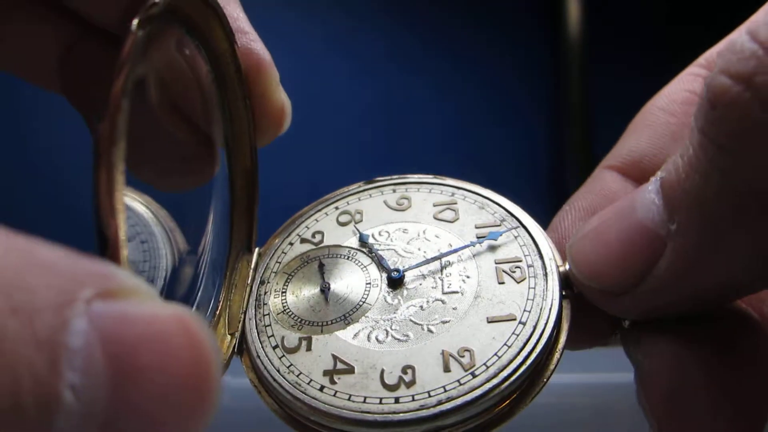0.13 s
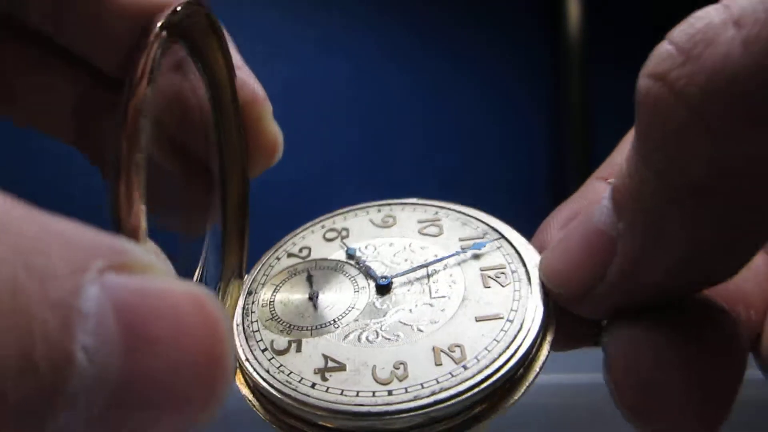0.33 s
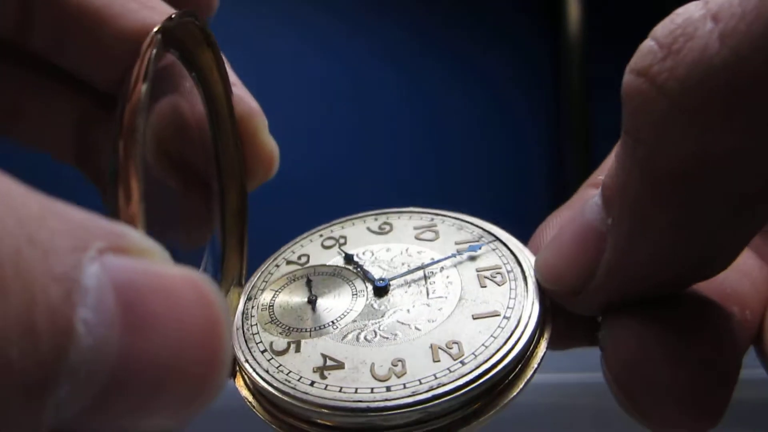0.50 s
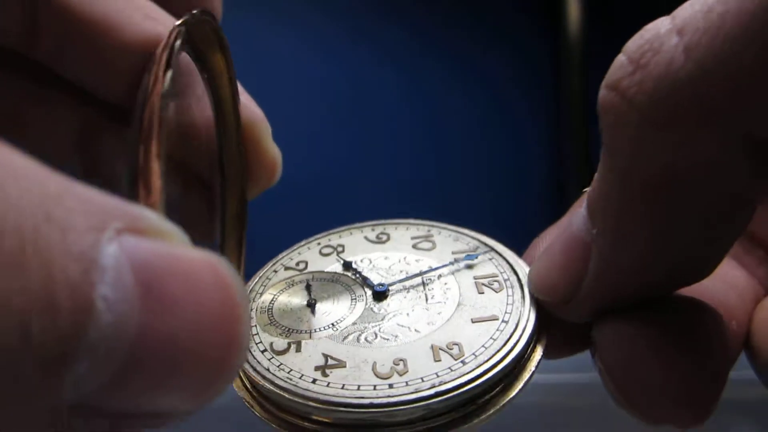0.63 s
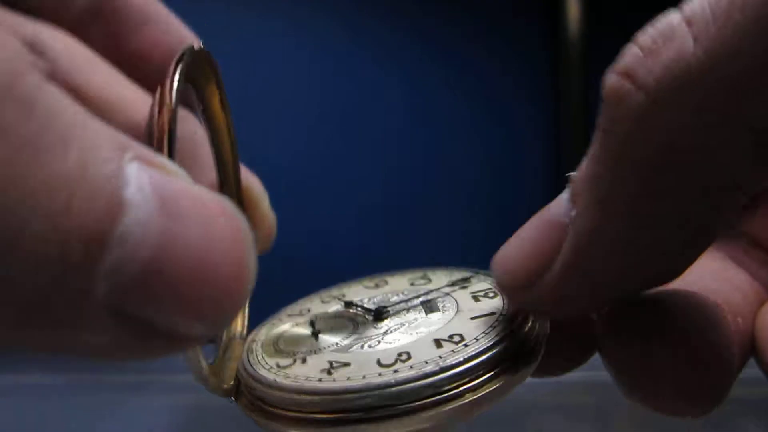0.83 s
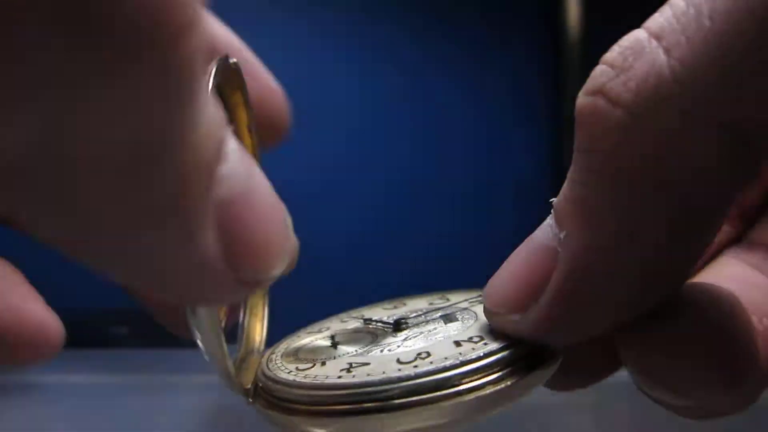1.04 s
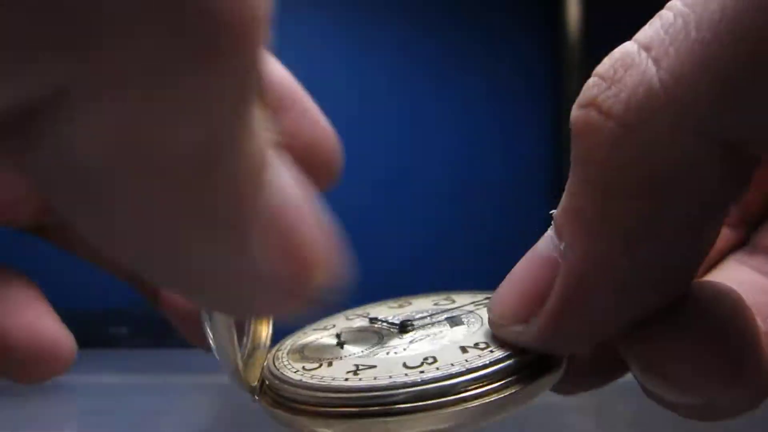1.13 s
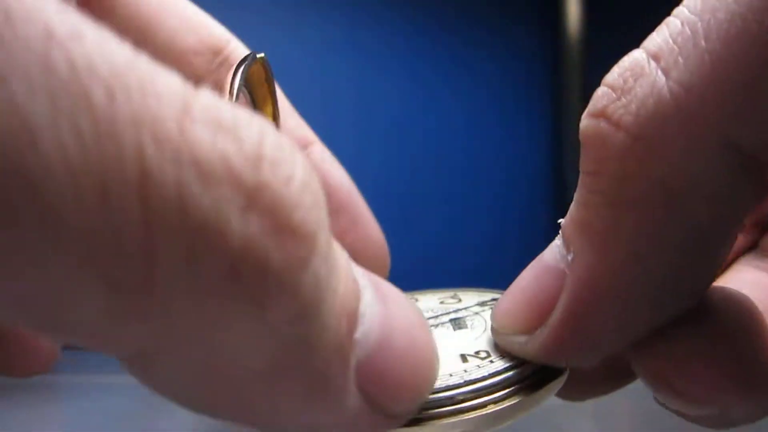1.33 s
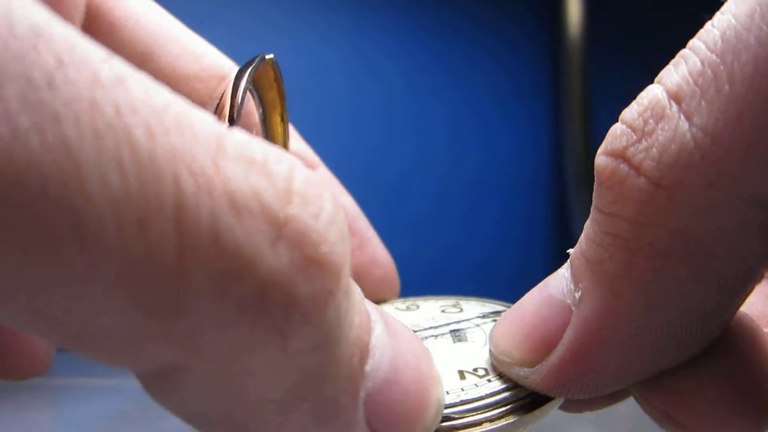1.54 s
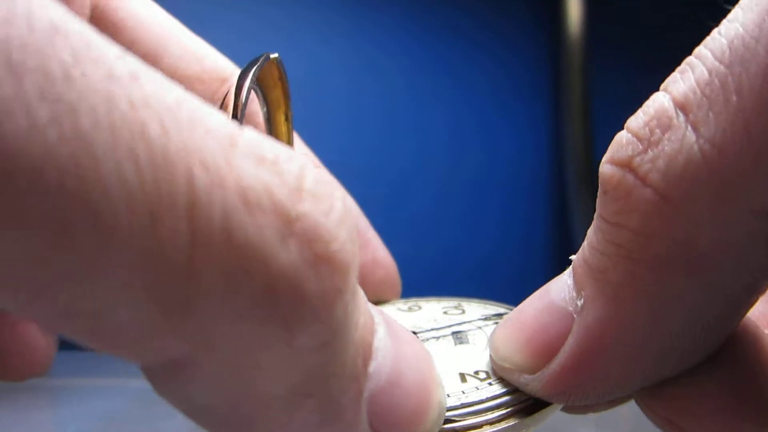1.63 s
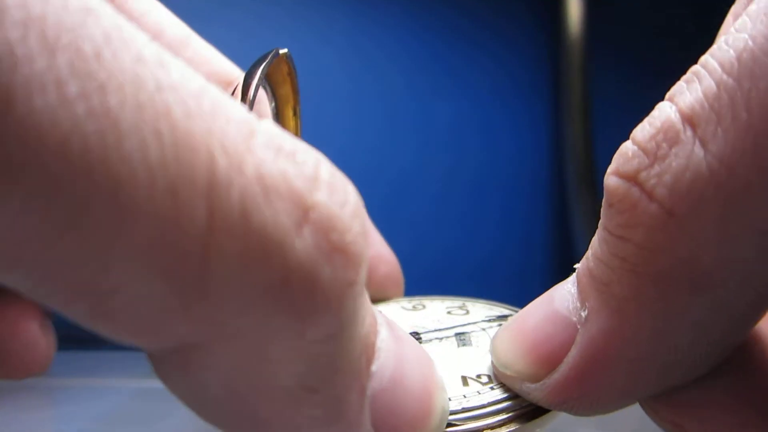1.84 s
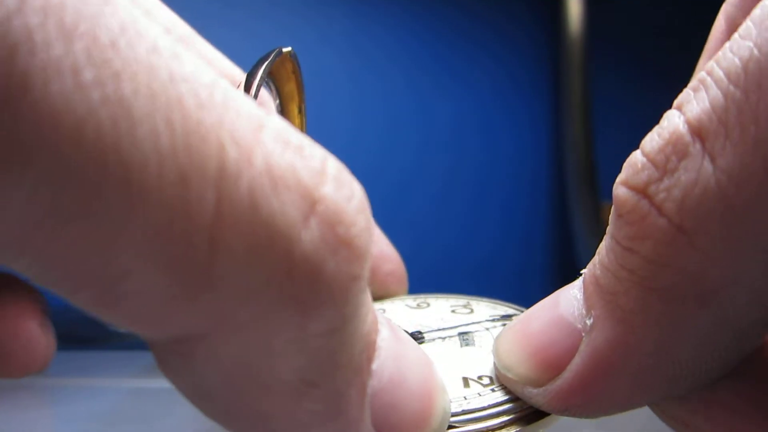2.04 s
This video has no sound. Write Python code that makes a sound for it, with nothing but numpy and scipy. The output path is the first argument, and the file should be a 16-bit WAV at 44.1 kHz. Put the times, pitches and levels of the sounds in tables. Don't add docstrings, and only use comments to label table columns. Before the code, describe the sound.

A pocket watch knocks hard on a shelf with a brief metallic ring, light clicks and bumps follow, then a loud sharp snap and a smaller click, over faint ticking and room hum, close microphone.

```python
import sys
import numpy as np
from scipy import signal
from scipy.fft import rfft, irfft
from scipy.io import wavfile
from scipy.ndimage import uniform_filter1d

SR = 44100
rng = np.random.default_rng(int(sys.argv[2]) if len(sys.argv) > 2 else 0)


def linear_from_db(decibels):
    return 10 ** (np.asarray(decibels, float) / 20)


def unload_wav(signal):
    wavfile.write(
        sys.argv[1],
        SR,
        np.round(np.clip(np.atleast_2d(signal).T, -1, 1) * 32767).astype(np.int16),
    )


N = 92610
T = np.arange(N) / SR


def evened(x):
    return x / np.sqrt(np.mean(x ** 2) + 1e-20)


def read(points, hz):
    f, value = np.transpose(points)
    return np.interp(np.log(hz + 1), np.log(f + 1), value)


def curve(points):
    s, db = np.transpose(points)
    return linear_from_db(np.interp(T, s, db, left=-120, right=-120))


def add(mix, s, sound):
    part = mix[round(s * SR):][:len(sound)]
    part += sound[:len(part)]


def ring(modes, pitch, size):
    t = np.arange(size) / SR
    return sum(linear_from_db(db - 60 * t / t60) * np.sin(2 * np.pi * hz * pitch * t) for hz, db, t60 in modes)


def band(x, hz, width_hz):
    edges = np.clip([hz - width_hz / 2, hz + width_hz / 2], 50, SR * .45)
    return evened(signal.sosfilt(signal.butter(2, edges, "band", fs=SR, output="sos"), x))


def high_pass(x, hz):
    return signal.sosfilt(signal.butter(2, hz, "high", fs=SR, output="sos"), x)


def strike(modes, db, contact_ms, pitch):
    u = np.arange(400) / (contact_ms * SR / 1000)
    push = u * np.exp(-u * 3)
    return -linear_from_db(db) * np.convolve(ring(modes, pitch, size=5000), push / push.sum())


def blows():
    # (time [s], shelf level [dB], case level [dB], contact [ms], pitch [ratio])
    knocks = [(0.2118, -30, -26.5, 0.25, 0.94), (0.2127, -1.5, -48, 1.24, 1.054),
              (.2146, -44, -19.5, 0.26, 0.92), (.217, -52, -23, 0.13, 1.03), (.4065, -65, -54, 0.26, 1.35),
              (.82, -32.5, -64, 1.5, .7), (0.913, -35, -49, 1, 0.79), (1.134, -37, -58, 1.2, 0.98),
              (1.141, -25, -32, 1.8, 0.87), (1.153, -44, -49, 0.48, 1.2), (1.1809, -32.5, -40, 0.88, 1.06),
              (1.301, -37.5, -65, 2.9, 0.69), (2.076, -48, -49, 0.52, 1.4)]
    # (frequency [Hz], level [dB], t60 [s])
    shelf_modes = [(174, -12, 0.07), (237.6, 2.5, 0.033), (429, 1, 0.012), (542, -25, 0.026)]
    # (frequency [Hz], level [dB], t60 [s])
    case_modes = [(700, -1.5, 0.038), (1000, -14, 0.014), (1265, 9.5, 0.008), (1657, 1.5, 0.019),
                  (2170, -1, 0.0089), (2510, 2, 0.025), (3880, -0.5, 0.026), (5100, -21, 0.01)]
    # (time [s], level [dB], contact [ms], direction [+-1])
    give = [
        (1.4687, -7, 0.064, -1),
        (1.4716, -30, 0.23, -1),
    ]
    # (time [s], level [dB], contact [ms], direction [+-1])
    settle = [
        (1.6133, -25.5, 0.45, -1),
        (1.6139, -13, 0.09, 1),
        (1.6171, -29.5, 0.12, -1),
    ]
    # (frequency [Hz], level [dB], t60 [s])
    give_modes = [(58.5, -24, 0.061), (186, -8, 0.023), (500, -20.5, 0.046), (790, -18, 0.027),
                  (1110, -10, 0.0071), (1410, 0.5, 0.0092), (1770, -13.5, 0.014), (2230, -13.5, 0.015),
                  (2870, -6, 0.0085), (3670, -6.5, 0.0066), (5220, -5, 0.0068)]
    # (frequency [Hz], level [dB], t60 [s])
    settle_modes = [(223, -18, 0.073), (538, -10.5, 0.037), (788, -12.5, 0.044), (1082, -9, 0.033),
                    (1396, 8.5, 0.0064), (1866, -1.5, 0.011), (2156, -15, 0.027), (2750, -18, 0.013),
                    (3200, -23, 0.022), (3840, -7.5, 0.018), (4770, -16, 0.01), (7240, -8, 0.0099)]

    out, deep = np.zeros(N), np.zeros(N)
    for s, shelf_db, case_db, contact_ms, pitch in knocks:
        shelf = strike(shelf_modes, shelf_db, contact_ms, pitch)
        case = strike(case_modes, case_db, contact_ms, pitch)
        add(out, s, shelf + case)
    for presses, modes, mix in ((give, give_modes, deep), (settle, settle_modes, out)):
        for s, db, contact_ms, way in presses:
            add(mix, s, -np.sign(way) * strike(modes, db, contact_ms, pitch=0.94))
    return high_pass(out, 238) + high_pass(deep, 49)


def rings():
    # (time [s], frequency [Hz], level [dB], t60 [s], direction [+-1])
    touches = [(.2146, 1120, -17.5, 0.03, 1), (.2146, 1410, -15, 0.019, 1), (.215, 2260, -21.5, 0.023, 1),
               (.2146, 550, -21, 0.045, 1), (.2135, 6700, -25.5, 0.015, 1), (.2185, 3070, -24, .03, 1),
               (.233, 3260, -30, .03, 1), (.726, 277, -25, 0.043, 1), (.7262, 708, -25.5, .04, 1),
               (.727, 560, -34, .03, -1), (.7265, 1120, -34, .018, 1), (.7265, 174, -36, 0.12, 1),
               (.727, 410, -29.5, 0.033, -1), (.7265, 1650, -41.5, .014, 1), (0.67, 370, -37, 0.023, 1),
               (.7668, 260, -24, 0.032, 1), (.768, 1430, -39, .012, 1), (.768, 900, -38, 0.01, 1),
               (.8695, 1200, -23.5, 0.0096, 1), (.8705, 2635, -30, .024, 1), (.8698, 3730, -34, 0.023, 1),
               (.87, 5600, -39, .016, 1), (.8737, 1820, -22, 0.0084, 1), (.8737, 3120, -38.5, .013, 1),
               (.8747, 255, -14.5, 0.035, -1), (.8745, 360, -26.5, 0.036, -1), (.8715, 6765, -38, .03, 1),
               (.8737, 550, -25, 0.035, 1), (.8737, 780, -27, 0.028, 1), (1.1148, 2680, -40.5, 0.018, 1),
               (1.1815, 1280, -41, 0.013, 1), (1.182, 710, -38, 0.034, 1), (1.1983, 422, -23.5, 0.023, -1),
               (1.2, 610, -38, 0.02, 1), (1.1983, 1340, -42.5, 0.017, 1), (1.472, 706, -12, 0.024, 1),
               (1.474, 376, -28.5, 0.049, 1), (1.4688, 6300, -21.5, 0.013, 1), (1.774, 650, -44.5, .02, 1),
               (1.774, 1330, -50, .015, 1)]
    rise_cycles = 0.18
    out, t = np.zeros(N), np.arange(4000) / SR
    for s, hz, db, t60, way in touches:
        rise = 1 - np.exp(-t * hz / rise_cycles)
        add(out, s, np.sign(way) * ring([(hz, db, t60)], 0.97, size=4000) * rise)
    return out


def cracks():
    # (time [s], level [dB], t60 [s], centre [Hz], width [Hz])
    bursts = [(1.2185, -48, .025, 8200, 700), (1.989, -59, .014, 12000, 4000),
              (1.797, -62, .014, 14000, 3500), (1.476, -33, .12, 560, 300), (.194, -56, 0.011, 13500, 4000),
              (.2122, -19, 0.029, 2700, 4000), (0.2147, -18.5, 0.0098, 11500, 8950),
              (0.2143, -29, 0.017, 2980, 3000), (0.2335, -48, 0.016, 12500, 6000),
              (.2147, -27, .012, 8100, 1200), (.218, -29, 0.064, 540, 400), (0.404, -62, 0.3, 2780, 3480),
              (.7257, -46, 0.014, 9300, 11500), (0.7262, -58, 0.013, 3650, 600),
              (0.769, -53, 0.0085, 4030, 6000), (0.8692, -40.5, 0.021, 6750, 8460),
              (0.8731, -37, 0.015, 4200, 5000), (0.8713, -41, 0.017, 4240, 1600),
              (1.116, -49, 0.012, 3500, 3000), (1.1145, -47, .012, 11800, 900),
              (1.132, -56, .01, 12100, 1500), (1.133, -48, 0.084, 550, 700), (1.148, -48, 0.06, 597, 900),
              (1.183, -46, .05, 500, 800), (1.136, -51.5, 0.055, 2520, 2960),
              (1.18, -51, 0.013, 4200, 6500), (1.199, -39.5, 0.077, 500, 500),
              (1.4685, -17.5, 0.013, 6400, 12900), (1.4706, -28.5, 0.025, 4000, 4500),
              (1.4706, -35, .025, 11000, 8000), (1.474, -50, .15, 2960, 3500),
              (1.478, -37, 0.25, 590, 1000), (1.6132, -25.5, 0.0063, 4670, 5100),
              (1.6166, -39.5, 0.012, 8700, 12400)]
    out, t = np.zeros(N), np.arange(3000) / SR
    noise = rng.standard_normal((40, 3000))
    attack = np.minimum(t / 0.00016, 1)
    for (s, db, t60, hz, width_hz), z in zip(bursts, noise):
        add(out, s, band(z, hz, width_hz) * linear_from_db(db - 60 * t / t60) * attack)
    return out


def cover():
    # (time [s], level [dB])
    pings = [
        (.1252, -69),
        (.1312, -69),
        (.2146, -20),
        (.2338, -36.5),
        (.8701, -58),
    ]
    mode_hz = [2075, 2940, 3047, 3147, 6786, 6792, 8145, 10551, 12010, 14880]
    # (level [dB], t60 [s])
    mode_decay = [(-23, .16), (-6, .02), (-19, .12), (-4, .04), (-1, .042), (-27, .27), (-32, .12),
                  (-34, .23), (-40, .12), (-35, .1)]
    out = np.zeros(N)
    modes = [(hz, *mode) for hz, mode in zip(mode_hz, mode_decay)]
    for s, db in pings:
        add(out, s, linear_from_db(db) * ring(modes, 1, size=18000))
    return out


def escapement():
    # (time [s], level [dB], ring against the fizz [dB])
    ticks = [
        (.0193, -51, 4),
        (.4173, -58, 0),
        (.6181, -63, 0),
        (.8154, -56, -1),
        (1.0205, -59, -2),
        (1.2185, -49.5, 0),
        (1.8214, -59, -1),
        (2.0187, -48.5, -2),
    ]
    # (delay [s], level [dB])
    steps = [
        (0, -2),
        (.0012, 0),
        (.003, -3),
        (.0052, -6),
    ]
    pallet_hz = [8940, 8500, 9070, 15100, 9000, 14550, 14900, 10700]
    fizz_t60_s, pallet_t60_s = .013, .016
    out, t = np.zeros(N), np.arange(1000) / SR
    fizz = rng.standard_normal((12, 4, 1000))
    for k, (s, db, ring_db) in enumerate(ticks):
        pallet = ring([(pallet_hz[k], ring_db, pallet_t60_s)], 1, size=1000)
        for j, (later, step_db) in enumerate(steps):
            hiss = band(fizz[k, j], 11600, 8400) + .16 * band(fizz[k, j], 5000, 5000)
            add(out, s + later, linear_from_db(db + step_db) * (pallet + linear_from_db(-60 * t / fizz_t60_s) * hiss))
    return out


def rub():
    # (time [s], level [dB])
    slide = [
        (.10, -84),
        (.12, -50),
        (.135, -52.5),
        (.16, -59),
        (.2, -74),
    ]
    grit_db = 6.5 * np.minimum(rng.exponential(1, N), 4)
    grit = rng.standard_normal(N) * linear_from_db(grit_db)
    return curve(slide) * band(grit, 1510, 2200)


def room(x):
    # (frequency [Hz], t60 [s])
    decay = [(100, 0.27), (500, 0.26), (2000, 0.22), (6000, 0.26), (15000, 0.28)]
    taps, at = np.zeros(SR // 2), np.arange(150, SR // 2 - 20, 20)
    taps[at + rng.integers(0, 20, len(at))] = rng.choice([-1., 1.], len(at))
    hz, t, z = signal.stft(taps, SR, nperseg=256)
    tilt_db = -1.5 * np.log2((hz + 100) / 1000)
    fade_db = tilt_db[:, None] - 60 * t / read(decay, hz)[:, None]
    tail = signal.istft(z * linear_from_db(fade_db), SR, nperseg=256)[1]
    return signal.fftconvolve(x, tail / np.linalg.norm(tail))[:N]


def hush():
    # (frequency [Hz], level [dB])
    air_spectrum = [(15, -47), (30, -2.5), (80, -10), (135, -8), (465, -14), (1110, -16), (2000, -24.5),
                    (7730, -31.5), (15800, -38.5)]
    # (centre [Hz], width [Hz], level [dB])
    steady_lines = [(124.9, 22.5, -60), (222, 51, -64), (1117, 110, -69.5), (7900, 160, -76)]
    # (time [s], gain [dB])
    riding = [(0, -0.5), (.2, 0), (.25, -7.5), (.4, -7.5), (.65, -3.5), (.75, -1), (1.0, -1.5), (1.4, 0),
              (1.6, -1.6), (1.8, -4), (2.1, -1.5)]
    frames, hz = N // 128 + 5, np.fft.rfftfreq(512, 1 / SR)
    a, b, patches = rng.standard_normal((frames, 257, 3)).T
    patches = evened(uniform_filter1d(uniform_filter1d(patches, 10, 0), 12, 1))
    patch_db = read([(300, 1.6), (2000, 1.0), (6000, 0.49)], hz)[:, None] * patches
    air = signal.istft((a + 1j * b) * linear_from_db(patch_db), nperseg=512, noverlap=384)[1][:N]
    fine_hz = np.fft.rfftfreq(N, 1 / SR)
    air = irfft(rfft(air) * linear_from_db(read(air_spectrum, fine_hz)) * (fine_hz < 15900), N)
    air = linear_from_db(-53.5) * evened(air - air.mean())
    lines = sum(linear_from_db(db) * band(rng.standard_normal(N), f_hz, w_hz) for f_hz, w_hz, db in steady_lines)
    whine = linear_from_db(-77) * np.sin(2 * np.pi * 7870 * T)
    return (air + lines + whine) * curve(riding)


def scene():
    watch = blows() + rings() + cracks() + cover() + escapement() + rub()
    return (watch + linear_from_db(-25.5) * room(watch) + hush())[None]


def top_cut(x):
    return signal.sosfilt(signal.butter(12, 16870, fs=SR, output="sos"), x)


def record(dry):
    # (time [s], level [dB])
    leakage = [
        (1.418, -82),
        (1.4225, -50.5),
        (1.428, -66),
        (1.437, -69),
        (1.44, -90),
    ]
    mute_s, unmute_s, mute_db = 1.4052, 1.4678, -33
    muted = uniform_filter1d(((T > mute_s) & (T < unmute_s)) * 1., size=30)
    leak = curve(leakage) * band(rng.standard_normal(N), 3500, 6400)
    x = np.tanh(dry * linear_from_db(mute_db * muted) + leak)
    x = signal.sosfilt(signal.butter(16, 16250, fs=SR, output="sos"), x)
    return top_cut(x)


dry = scene()
out = record(dry)
unload_wav(out)
```